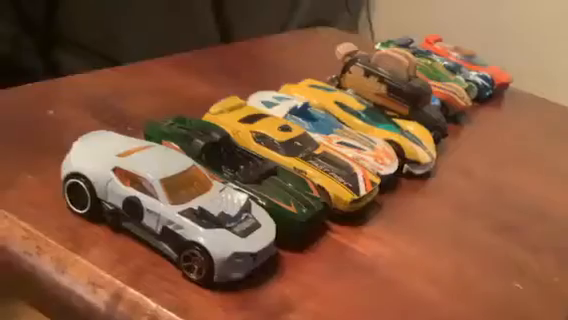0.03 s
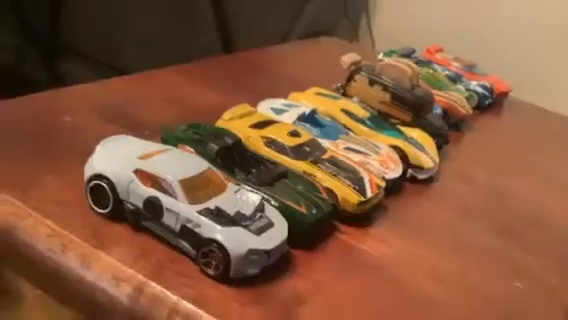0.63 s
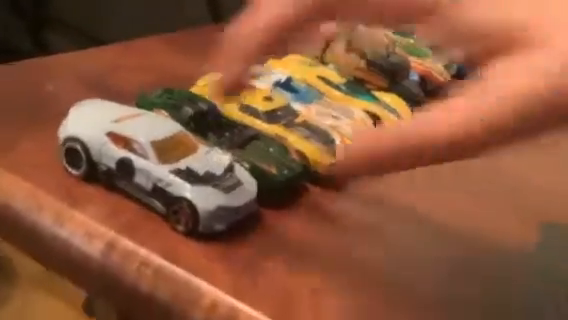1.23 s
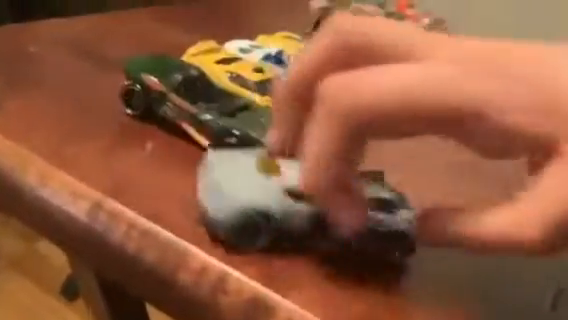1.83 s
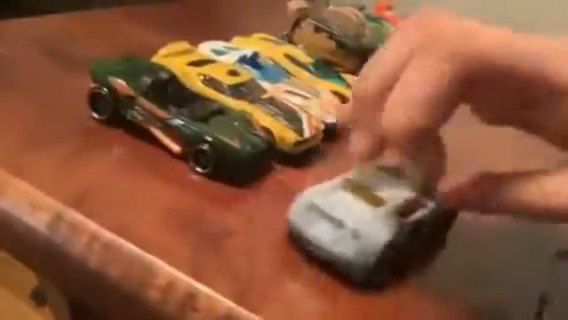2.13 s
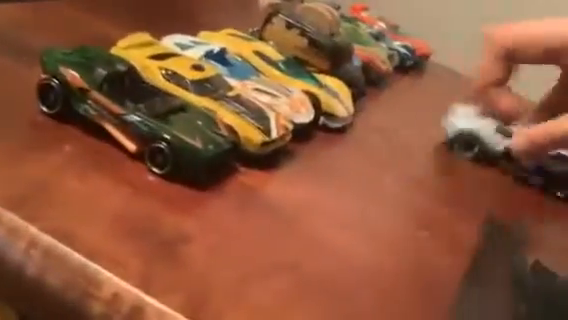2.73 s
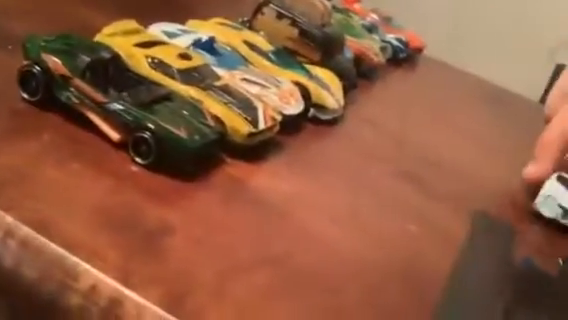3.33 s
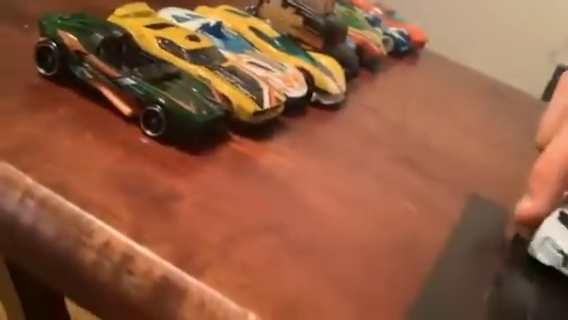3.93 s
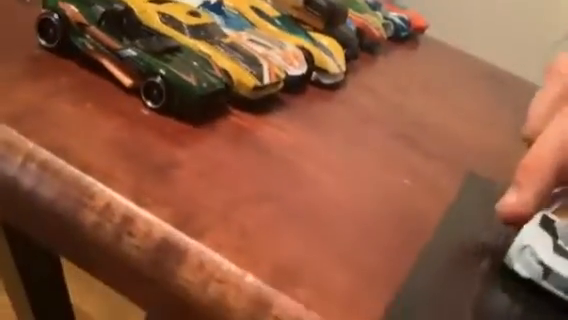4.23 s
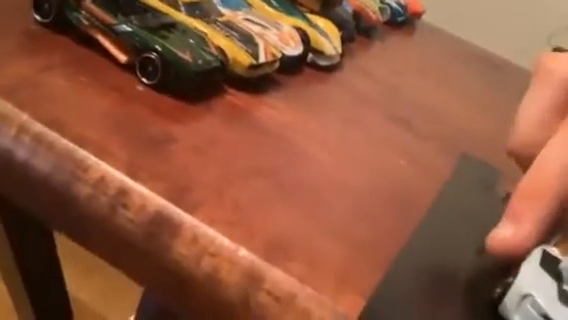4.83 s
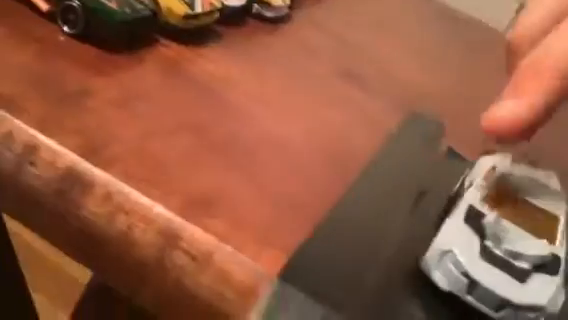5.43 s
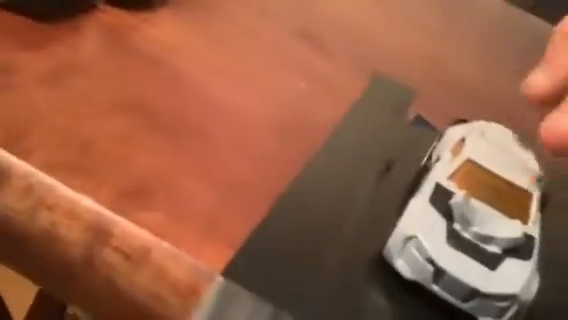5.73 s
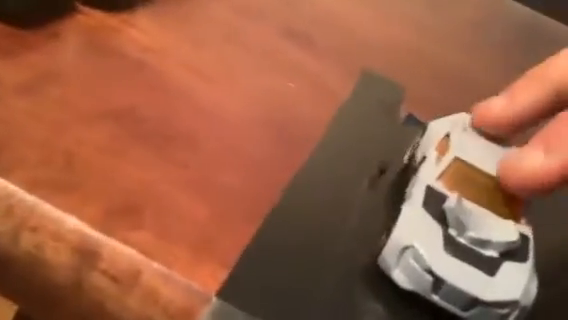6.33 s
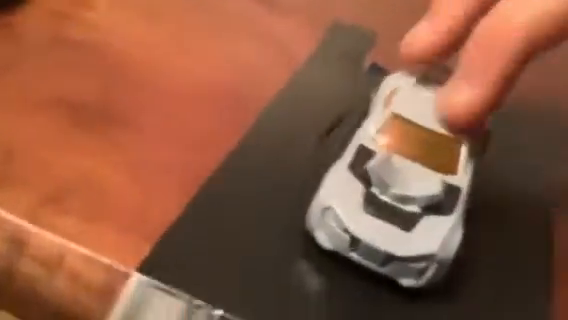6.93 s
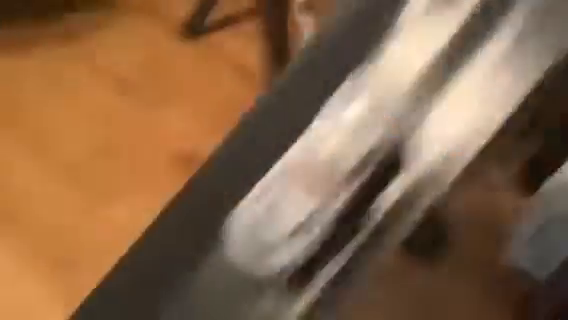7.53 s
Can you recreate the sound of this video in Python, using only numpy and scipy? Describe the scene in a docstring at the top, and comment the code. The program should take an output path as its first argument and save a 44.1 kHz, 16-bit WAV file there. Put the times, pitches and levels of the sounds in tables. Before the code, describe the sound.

A hand brushes and bumps the close microphone. A small metal toy car is picked up and pushed over a wooden table, its hard wheels chattering softly and its loose axles clicking. The clicks thin out, and fingers rub faintly on plastic. Near the end a start gate drops with a loud clack and clatter, and the car begins rattling down a plastic track. The room is quiet, with a faint hum.

```python
"""A die-cast toy car on a wooden table, close to a hand-held phone, in a quiet room that hums and sizzles.
At 0.8 s a hand brushes and bumps the phone. From 1.4 s the car is picked out of a row and pushed over
the wood: hard wheels chatter, wheels and loose axles click. From 6.4 s it is set on a plastic track with
ticks and finger rubs. At 7.2 s the start gate drops with a clack, track and shell ring, the car rocks
and then rattles down the track, gathering speed."""
import sys
import numpy as np
from scipy import signal
from scipy.fft import rfft, irfft
from scipy.io import wavfile

SR = 44100
rng = np.random.default_rng(int(sys.argv[2]) if len(sys.argv) > 2 else 0)


def dump_mix(stems):
    """Bounce the given channels to the path in sys.argv[1] as a 16-bit WAV at rate SR."""
    frames = np.atleast_2d(stems).T  # one column per channel
    limited = np.clip(frames, -1, 1)  # hard clip at full scale
    pcm = np.round(limited * 32767).astype(np.int16)
    wavfile.write(sys.argv[1], SR, pcm)


N = 338247
T = np.arange(N) / SR
AGE = T[:SR // 3]  # time within one event, s

# resonances of the car's parts and the table top: f/Hz, width/Hz, level/dB
WHEEL_PEAKS = [(3452, 190, 3.5), (3670, 610, 4.5)]
SHELL_PEAKS = [(4116, 133, 3.5), (4283, 290, 8), (4930, 310, 6), (5400, 410, -0.5)]
CHASSIS_PEAKS = [(1896, 200, -4), (2386, 200, -2), (2666, 70, 0)]
AXLE_PEAKS = [(6560, 340, -5.5), (7200, 570, -3.5), (8160, 790, -4.5), (9150, 200, -6.5)]
TABLE_PEAKS = [(350, 72, 0), (455, 187, 3.5), (638, 100, -4), (876, 230, -4.5), (1005, 62, 1),
               (1158, 260, -3)]
# ringing modes of shell and chassis: f/Hz, level/dB, T60/s
CAR_MODES = [(3455, -1, .15), (4222, 0, .16), (4282, -3, .13), (4608, -3, .13), (4850, -6, .09),
             (5280, -7, .08), (5545, -8, .1), (6572, 0, .17), (6612, -4, .15), (7120, -7, .1),
             (7952, -1, .08), (8102, 0, .1), (8262, 1, .14)]


def amp(db):
    """Decibels to gain."""
    return 10 ** (np.asarray(db) / 20)


def unit(x):
    """Scale to rms 1."""
    return x / np.sqrt(np.mean(x ** 2))


def add(out, start_s, sound):
    """Mix a sound in at start_s."""
    i = int(start_s * SR)
    out[i:i + len(sound)] += sound[:N - i]


def colour(x, points, lift_db=0):
    """Minimum-phase filter through (f/Hz, level/dB) points, with a 3 kHz treble shelf."""
    hz, db = np.transpose(points)
    f = np.arange(1025) * SR / 2048 + 1
    db = np.interp(np.log(f), np.log(hz), db) + lift_db * f ** 2 / (f ** 2 + 3000 ** 2)
    cepstrum = irfft(np.log(amp(db)))
    cepstrum[1:len(f) - 1] *= 2
    cepstrum[len(f):] = 0
    impulse = irfft(np.exp(rfft(cepstrum)))
    return signal.fftconvolve(x, impulse)[:len(x)]


def resonate(x, peaks):
    """Parallel resonances, each filtered twice for steep skirts."""
    return sum(amp(db) * signal.sosfilt([np.concatenate(signal.iirpeak(hz, hz / width_hz, SR))] * 2, x)
               for hz, width_hz, db in peaks)


def ring(modes):
    """Decaying modes; each blow lands on another spot and shares its force differently."""
    hz, db, t60_s = np.transpose(modes)[:, :, None]
    size = amp(db + 2 * rng.standard_normal(hz.shape))
    phase = 2 * np.pi * (hz * AGE + rng.random(hz.shape))
    partials = size * np.sin(phase) * amp(-60 * AGE / t60_s)
    return np.sum(partials, axis=0) / np.sqrt(np.sum(size ** 2) / 2)


def burst(decay_ms, shape, rise_ms=.05):
    """One contact: a noise pulse filtered by shape, with the energy of a decay from rms 1."""
    ms = AGE * 1000
    fade = np.exp(-ms / decay_ms)
    rise = 1 - np.exp(-ms / rise_ms)
    x = shape(rng.standard_normal(len(AGE)) * fade * rise)
    return x * np.sqrt(np.sum(fade ** 2) / np.sum(x ** 2))


def drift(rate_hz):
    """Random curve with a spread near 1."""
    knots = rng.standard_normal(2000)
    return np.interp(T * rate_hz, np.arange(len(knots)), knots)


def grains(rate_hz, spread_db):
    """Tiny uneven impacts of one rough surface passing over another."""
    size = amp(spread_db * np.minimum(rng.exponential(size=N), 4))
    hits = rng.random(N) < rate_hz / SR
    return unit(hits * size * rng.standard_normal(N))


def push_gain(column, speed_power, tilt_db):
    """Gain of one part over all pushes of the hand; speed follows a half sine in each."""
    # t/s, length/s, then level/dB of wheels, chassis, axles, table
    pushes = [(1.492, .11, -60.5, -68.5, -66, -57.5), (1.537, .36, -64, -70, -70.5, -59),
              (1.857, 0.096, -60, -63, -66, -66), (1.858, .5, -63.5, -69, -68.5, -67.5),
              (2.109, 0.057, -78, -78, -55, -78), (2.327, .13, -56, -70, -67, -59.5),
              (2.316, .73, -48.5, -52.5, -59, -55), (3.219, 0.15, -56, -59, -62, -59),
              (3.3, 0.34, -67, -67, -70, -62), (3.868, .1, -64, -71, -66, -80),
              (3.938, 0.44, -65.5, -69, -62, -68)]
    ease_from, ease_db = .81, -9  # the fingers ease off over the end of a push
    energy = np.zeros(N)
    for start_s, length_s, *levels_db in pushes:
        during = (T > start_s) & (T < start_s + length_s)
        along = (T[during] - start_s) / length_s
        speed = np.abs(np.sin(np.pi * along))
        ease = np.maximum(along - ease_from, 0) / (1 - ease_from)
        db = levels_db[column] + tilt_db * (along - .5) + ease_db * ease
        energy[during] += (speed ** speed_power * amp(db)) ** 2
    return np.sqrt(energy)


def table_roll():
    """Hard wheels chatter over wood; each part of the car and the table answers in its own band."""
    wheels = push_gain(0, speed_power=1.26, tilt_db=-8)
    chassis = push_gain(1, speed_power=1.27, tilt_db=7.7)
    axles = push_gain(2, speed_power=1.6, tilt_db=-5.5)
    table = push_gain(3, speed_power=.71, tilt_db=1.5)
    shell = amp(-.1) * np.sqrt(wheels * axles)  # shaken by both
    chatter = grains(5000, spread_db=2) * amp(1.3 * drift(70))
    out = np.zeros(N)
    for gain, peaks in [(wheels, WHEEL_PEAKS), (shell, SHELL_PEAKS), (chassis, CHASSIS_PEAKS),
                        (axles, AXLE_PEAKS), (table, TABLE_PEAKS)]:
        # the load shifts from wheel to wheel, so each resonance comes and goes
        out += gain * unit(sum(resonate(chatter, [peak]) * amp(3.35 * drift(25.026)) for peak in peaks))
    return out


def car_clicks():
    """Wheels, axles and shell tick, each tick with a faint ring and a knock in the surface below."""
    # t/s, relative level/dB, brightest f/Hz, decay/ms
    ticks = [(1.4112, -45, 8600, 3.8), (1.503, -33.5, 8420, 2.3), (1.5114, -38.5, 2680, 3.3),
             (1.633, -39, 8680, 2.8), (1.701, -38.5, 3800, 3.2), (1.722, -39.5, 4200, 2.2),
             (1.7808, -38, 8000, 2), (1.8996, -34, 3380, 3.6), (2.1122, -35.5, 5200, 1.1),
             (2.2953, -44.5, 8500, 5.6), (2.355, -40.5, 3300, 3), (2.394, -37.5, 3700, 5),
             (2.5189, -30, 3500, 5.2), (2.566, -31.5, 3230, 2.9), (2.6197, -33, 3350, 2.3),
             (2.7023, -31, 2680, 4.1), (2.778, -30.5, 3340, 3.5), (2.898, -36, 2290, 2.3),
             (3.2164, -27, 5170, 2.9), (3.2445, -37, 3400, 3.5), (3.316, -33, 3370, 2.3),
             (3.3254, -35.5, 3500, 3.5), (3.5015, -33.5, 6500, 3.8), (3.9, -39.5, 3580, 4.6),
             (4.016, -37.5, 5040, 3.2), (4.082, -37, 2440, 4.9), (4.1788, -42, 4280, 2.1),
             (4.6289, -42, 2580, 7.5), (5.0264, -46, 4640, 3.1), (5.251, -44, 5330, 7.5),
             (5.8861, -46, 4630, 6.9), (6.4164, -31, 4300, 1.9), (7.0867, -38, 4900, 2.9),
             (7.1083, -35.5, 6550, 2.7), (7.1243, -36.5, 4400, 4.7)]
    knock_db, ring_db = -20.5, -29  # relative to the tick
    out = np.zeros(N)
    for start_s, db, hz, decay_ms in ticks:
        band = [(hz / 4, -14), (hz / 2, -5), (hz, 0), (hz * 2, -8)]
        # each tick strikes another spot and favours other resonances
        body = [(peak_hz, width_hz, peak_db + 3 * rng.standard_normal())
                for peak_hz, width_hz, peak_db in SHELL_PEAKS + CHASSIS_PEAKS + AXLE_PEAKS]

        def through_car(x):
            return colour(1.17 * x + resonate(x, body) + .85 * resonate(x, WHEEL_PEAKS), band)

        tick = burst(decay_ms, through_car, rise_ms=.81)
        knock = burst(decay_ms=5.8, shape=lambda x: resonate(x, TABLE_PEAKS))
        add(out, start_s, amp(db) * (tick + amp(knock_db) * knock + amp(ring_db) * ring(CAR_MODES)))
    return amp(-5.5) * out


def gate_clacks():
    """The gate slaps down, the car rocks and its wheels drop over it; track and shell ring on."""
    # t/s, crack level/dB, decay/ms, treble lift/dB, track level/dB, shell level/dB
    blows = [(7.2045, -19.5, 2.3, 0, -58, -28), (7.2066, -16, 1.46, -15.5, -25, -50),
             (7.236, -26, 4.8, 0, -55, -45), (7.3335, -26.5, 2.6, 4, -58, -47),
             (7.338, -22, 2.8, 5, -51, -61), (7.367, -17, 3.9, 8.5, -40, -37),
             (7.417, -29.5, 5.3, -1, -62, -66)]
    rocking = [(7.228 + k * .025, -41, 6, 0, -48.5, -39) for k in range(4)]
    # modes of the plastic track and gate: f/Hz, level/dB, T60/s
    track_modes = [(322, -8, .18), (368, -2, .18), (435, 1.5, .25), (505, -7, .1), (592, -6, .14),
                   (652, -3, .3), (863, -3, .13), (1038, 1, .17), (1078, 1, .17), (1194, -2, .15),
                   (1366, 2, .2), (1738, -3, .08), (2525, -1, .1), (2670, -3, .07)]
    # spectra of a hard crack and of the track's short, crowded modes: f/Hz, level/dB
    crack_spectrum = [(170, -35), (350, 2.5), (1100, -12.5), (2000, -5), (2550, -13), (3000, -4.5),
                      (3500, -1), (4600, 1.5), (6000, -7), (6600, -1.5), (8000, -3.5), (9000, -2)]
    clatter_spectrum = [(190, -36.5), (300, 2), (430, 1.5), (750, -4.5), (1100, -0.5), (1500, -3.5),
                        (2050, -12), (2550, -1.5), (3000, -23), (4200, -7), (6000, -14), (8000, -4),
                        (9000, -40)]
    out = np.zeros(N)
    for start_s, crack_db, decay_ms, lift_db, track_db, shell_db in blows + rocking:
        crack = burst(decay_ms, lambda x: colour(x, crack_spectrum, lift_db), rise_ms=.47)
        clatter = burst(decay_ms=18.5, shape=lambda x: colour(x, clatter_spectrum))
        track = amp(-1) * ring(track_modes) + clatter
        add(out, start_s, amp(crack_db) * crack + amp(track_db) * track + amp(shell_db) * ring(CAR_MODES))
    return out


def track_run():
    """Wheels rattle on the track: they creep to the gate, shake as it falls, then speed up evenly."""
    # resonances of the track bed: f/Hz, width/Hz, level/dB
    bed_peaks = [(396, 900, -7.5), (910, 760, -9.5), (1710, 170, -2.5), (2160, 290, -3), (2840, 500, -6.5),
                 (3510, 230, 3.5), (3670, 250, 1.5), (4370, 240, 1), (4920, 490, -0.5), (5480, 310, 0),
                 (6520, 200, 3.5), (7200, 670, -2.5), (8400, 870, -3)]
    creep_s, gate_s, roll_s = 7.05, 7.2, 7.36
    attack_s, hold_s, release_s = .022, .099, .027
    creep = amp(-64) * (T > creep_s)
    attack = np.clip((T - gate_s) / attack_s, 0, 1)
    release = np.exp(-np.maximum(T - gate_s - hold_s, 0) / release_s)
    shake = amp(-39) * attack * release
    roll = amp(-29.5) * np.maximum(T - roll_s, 0)  # grows with speed
    chatter = grains(5000, spread_db=1.8) * amp(1.8 * drift(110))
    bed = unit(sum(resonate(chatter, [peak]) * amp(1.4 * drift(50)) for peak in bed_peaks))
    return np.sqrt(creep ** 2 + shake ** 2 + roll ** 2) * bed


def finger_rubs():
    """Skin slides on plastic in short strokes: fine, dense slips that swell and stop."""
    # peak t/s, level/dB, rise/ms, fall/ms, treble lift/dB
    strokes = [(.772, -62.5, 26, 13, 14), (.82, -54.5, 12, 18, 4), (0.885, -42.5, 7.6, 8, 16.5),
               (0.901, -36, 8.8, 2.7, 19.5), (0.924, -51, 11, 7.6, 10), (6.503, -47.5, 30, 35, 7),
               (6.532, -51.5, 15, 32, 2), (6.662, -47, 4.7, 11, -5), (6.673, -52, 14, 36, 20),
               (6.73, -52, 1.8, 34, -0.5), (6.862, -58, 18, 55, 2), (6.898, -41.5, 2.5, 5.8, -12),
               (6.932, -48.5, 27, 39, 5)]
    # skin friction: f/Hz, level/dB
    spectrum = [(100, -13.5), (230, -5.5), (380, 4.5), (680, -7), (1050, -1.5), (1600, -9), (2800, -17),
                (5200, -14.5), (7800, -17.5), (9000, -26)]
    slips = grains(20000, spread_db=1) * amp(1.5 * drift(300))
    out = np.zeros(N)
    for peak_s, db, rise_ms, fall_ms, lift_db in strokes:
        first = int(peak_s * SR) - len(AGE) // 2
        span = slice(first, first + len(AGE))
        ms = (T[span] - peak_s) * 1000
        swell = np.exp(np.minimum(ms / rise_ms, -ms / fall_ms))
        add(out, T[first], amp(db) * swell * unit(colour(slips[span], spectrum, lift_db)))
    return out


def case_bumps():
    """The hand nudges the phone's case, which answers with a few dull cycles."""
    # t/s, level/dB, f/Hz, decay/ms
    nudges = [(0.77, -34, 223, 4.2), (.817, -38.5, 297, 6.7), (.9, -31, 274, 10.5), (.915, -36, 103, 10.3),
              (0.932, -24.5, 208, 6.1)]
    rise_s = .003
    out = np.zeros(N)
    for start_s, db, hz, decay_ms in nudges:
        envelope = (1 - np.exp(-AGE / rise_s)) * np.exp(-AGE * 1000 / decay_ms)
        add(out, start_s, -amp(db) * envelope * np.sin(2 * np.pi * hz * AGE))
    return out


def room(x):
    """A small furnished room adds a short, dull tail."""
    t60_s, delay_s, tail_db = .58, .005, -20.5
    tail = rng.standard_normal(len(AGE)) * amp(-60 * AGE / t60_s) * (AGE > delay_s)
    tail = colour(tail, [(200, 17), (3000, -12.5), (9000, -28.5)])
    tail /= np.sqrt(np.sum(tail ** 2))
    return x + amp(tail_db) * signal.fftconvolve(x, tail)[:N]


def room_air():
    """Soft rumble and hiss of the room, with the wavering hum of a far appliance."""
    # room noise: f/Hz, relative density/dB
    spectrum = [(21, -37.5), (36, 0), (91, -1.5), (203, -6), (228, 0), (261, -5.5), (300, -0.5),
                (345, -2.5), (465, -7.5), (689, -11), (973, -16), (1070, -17.5), (2030, -25.5),
                (5000, -25.5), (8900, -27), (11600, -78.5), (19600, -120)]
    # appliance tones: f/Hz, rms level/dB
    tones = [(80.7, -76), (236.9, -73), (296.1, -69), (1007, -80)]
    hz, db = np.transpose(spectrum)
    f = np.arange(N // 2 + 1) * SR / N + 1
    response = amp(np.interp(np.log(f), np.log(hz), db))
    noise = unit(irfft(rfft(rng.standard_normal(N)) * response, N))
    hum = sum(amp(tone_db) * np.sqrt(2) * np.sin(2 * np.pi * tone_hz * T + .57 * drift(14))
              for tone_hz, tone_db in tones)
    return amp(-59.5 + .5 * drift(4.07)) * noise + hum


def mains_sizzle():
    """A thin electric sizzle flares once per mains cycle; it starts louder and settles."""
    # sizzle: f/Hz, level/dB
    spectrum = [(1000, -22), (4750, -20), (5400, 6.5), (6200, 3), (7600, 0.5), (8400, -17.5)]
    mains_hz, settle_s = 60, .68
    flare = .3 + np.sin(np.pi * mains_hz * T) ** 8
    level_db = -74.5 + 5 * np.exp(-T / settle_s)
    return amp(level_db) * unit(colour(flare * rng.standard_normal(N), spectrum))


def scene():
    """Car and track sound in the room; rubs, case bumps and background are added without its tail."""
    car = car_clicks() + table_roll() + gate_clacks() + track_run()
    return (room(car) + finger_rubs() + case_bumps() + room_air() + mains_sizzle())[None]


def record(dry):
    """The phone's microphone opens a moment late; its port makes a dip and the top is cut."""
    # microphone port: f/Hz, level/dB
    port_dip = [(5500, 0), (5800, -2), (6050, -2.5), (6300, -2), (6500, 0)]
    open_s, cutoff_hz = .072, 9200
    heard = colour(dry[0] * (T > open_s), port_dip)
    lowpass = signal.ellip(10, .2, 70, cutoff_hz, fs=SR, output="sos")
    return signal.sosfilt(lowpass, heard)[None]


dry = scene()
out = record(dry)
dump_mix(out)
```